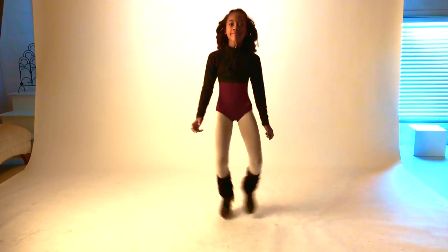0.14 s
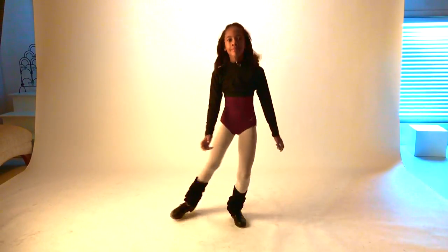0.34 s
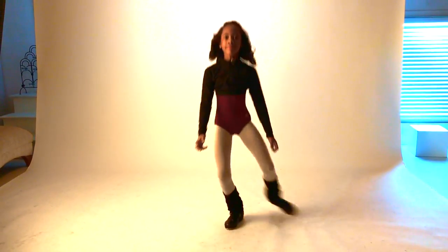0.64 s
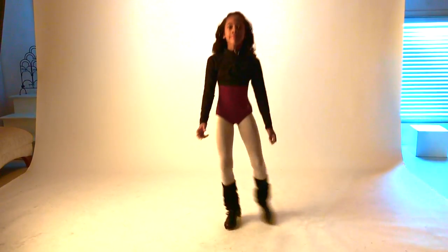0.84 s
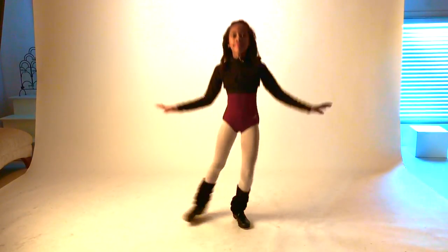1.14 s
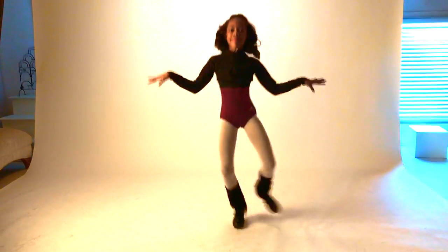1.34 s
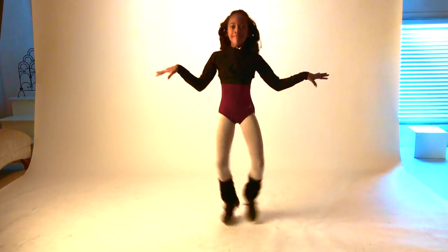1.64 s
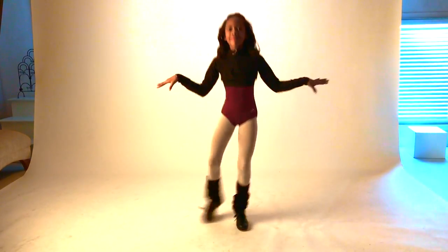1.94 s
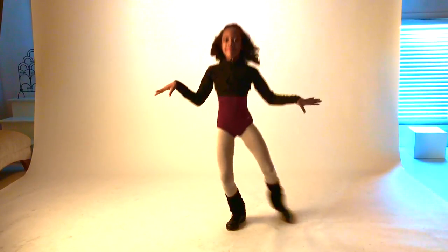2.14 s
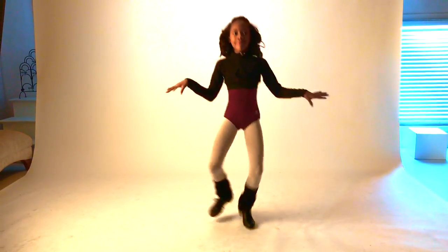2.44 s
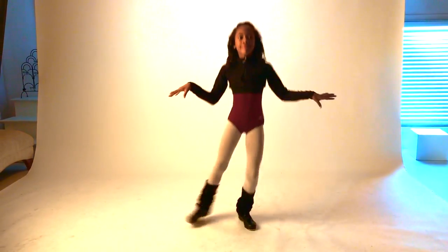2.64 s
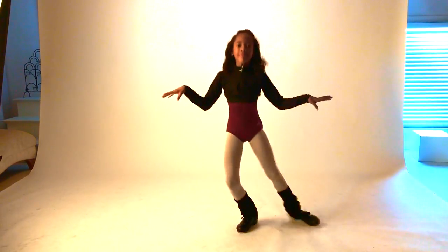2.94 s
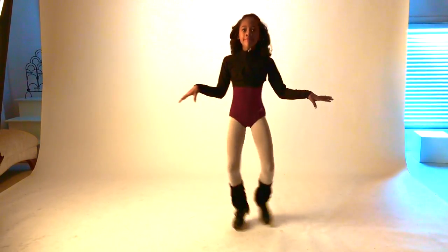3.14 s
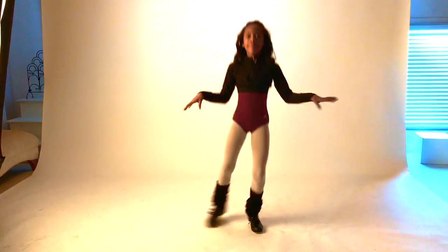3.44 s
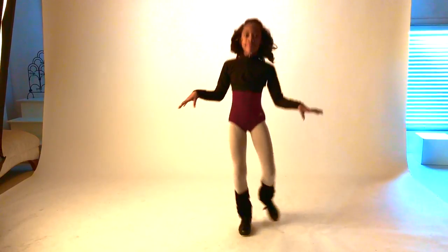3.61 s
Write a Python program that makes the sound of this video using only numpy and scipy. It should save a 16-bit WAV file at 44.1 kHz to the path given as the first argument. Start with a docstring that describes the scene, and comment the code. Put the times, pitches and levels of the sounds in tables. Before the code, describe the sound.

Tap shoes click sharply in a quick, near-continuous rhythm on a hard, echoing studio floor.

```python
"""Tap dance on a hard floor

A dancer in tap shoes steps and shuffles in a bare studio, a few metres from the microphone.
Each contact is a noise crack with a snap, damped plate and sole modes, and a floor thump of modes and noise.
The room answers with a diffuse tail, a noise cluster about 17 ms later and two delayed copies of the click.
Soft heel landings are damped sines; a quiet noise rumble lies underneath."""
import sys
import numpy as np
from scipy import signal
from scipy.fft import rfft, irfft, next_fast_len
from scipy.io import wavfile
from scipy.ndimage import map_coordinates

SR = 44100
rng = np.random.default_rng(int(sys.argv[2]) if len(sys.argv) > 2 else 0)


def store_pcm(level_fs):
    """Save levels as 16-bit WAV."""
    pcm = np.round(np.clip(level_fs, -1, 1) * 32767).astype(np.int16)
    wavfile.write(sys.argv[1], SR, np.atleast_2d(pcm).T)


N = 166257
TIME_S = np.arange(SR) / SR

# studio rumble spectrum: (frequency [Hz], relative level [dB])
AIR_COLOUR = [(20, -26), (40, -21), (57, 12), (80, -7.5), (150, 6.5), (400, 1.5), (1000, -9.5), (3000, -9),
              (7000, -32), (16000, -32)]
AIR_DB = -50.5

# floor modes: (frequency [Hz], relative level [dB], t60 [s])
FLOOR_MODES = [(58, -14, .5), (145.1, -7.5, 0.45), (181, -7.5, 0.53), (206.1, 1, 0.51), (233.4, -4, 0.41),
               (292, -7.5, 0.45)]
FLOOR_DB, FLOOR_ATTACK_S = -6.5, 0.003
# floor thud spectrum: (frequency [Hz], relative level [dB])
THUD_COLOUR = [(30, -38), (60, -29), (100, -25), (135, 2.5), (220, -5), (320, -6), (550, -15), (1200, -42),
               (4000, -70)]
THUD_DB, THUD_T60_S = 2, 0.13
# thud and its returns from the walls: (delay [s], relative level [dB])
THUMP_ECHOES = [(0, -3.5), (.014, -1.5), (.034, -1.5)]
BOOM_DB, BOOM_WIDTH_RATIO = 5.5, 0.2  # each spot of the floor booms at its own pitch

# clack as the room returns it: (frequency [Hz], relative level [dB])
CLACK_COLOUR = [(100, -31), (250, 4), (400, -1.5), (580, -5.5), (880, -0.5), (1150, -3), (1500, 1.5),
                (2100, -1), (2900, 1), (3900, 0), (5000, -1.5), (5800, -2.5), (7500, -13), (8600, -9.5),
                (10400, -23.5), (11900, -20), (16000, -34)]
# decay of the diffuse tail: (frequency [Hz], t60 [s])
ROOM_T60 = [(150, 0.8), (400, 0.89), (900, 1), (1600, 0.78), (4000, .6), (8000, 0.43), (15000, 0.27)]
TAIL_DB, TAIL_ONSET_S = -1, 0.0056
# extra colour of the first reflections: (frequency [Hz], gain [dB])
CLUSTER_COLOUR = [(200, -11.5), (800, -2), (2000, 0), (4000, 0.5), (9000, 1.5), (15000, -1)]
CLUSTER_DB, CLUSTER_DELAY_S, CLUSTER_RISE_S, CLUSTER_T60_S = 4.5, 0.01685, 0.0021, 0.079
# narrow resonances of room and floor: (frequency [Hz], gain [dB])
ROOM_PEAKS = [(716, 1.5), (835, 0.5), (940, 0.5), (1385, 2), (1549, 2), (1652, 0), (2944, 3)]
ROOM_PEAK_HALF_WIDTH_HZ = 15.6
PLATE_ECHO_DB, PLATE_ECHO_WIDTH_RATIO = 1.5, 0.093  # plate pitch stands out in the room too
GRAIN_DB, GRAIN_PER_S = 1.5, 900  # reflections arrive in uneven bunches
STEADY_POWER_SHARE = 0.21  # part of the room's answer that is the same for every tap
# clear wall reflections of the click: (delay [s], level re click [dB])
WALLS = [(0.0181, -15.5), (0.022, -13)]
WALL_SCATTER_S = 0.00034  # the feet move about
# step before the start whose echo still hangs in the room: (time [s], level [dB])
EARLIER_STEP = (-.035, -33.5)

# soft heel landings: (time [s], level [dB])
HEELS = [(3.716, -27)]
HEEL_HZ, HEEL_ATTACK_S, HEEL_T60_S = 146, 0.0064, 0.28

# metal plate modes: (ratio to plate pitch [-], relative level [dB], t60 [s])
PLATE_MODES = [(0.999, 0.5, 0.0084), (1.131, -7, 0.01), (.82, -11, 0.013), (1.42, -8, 0.0053),
               (2.27, -32, 0.0023), (3.4, -45, 0.0033)]
PLATE_DB, PLATE_ATTACK_S, MODE_SCATTER_DB = 12.5, 0.00087, 0.6
# crack spectrum: (frequency [Hz], relative level [dB])
CRACK_COLOUR = [(40, -40), (130, -12), (350, -28), (600, -1), (900, 3.5), (2300, 1.5), (4000, -1),
                (6000, 0.5), (7500, -8), (8700, -3.5), (10300, -17.5), (12000, -10), (16000, -28)]
CRACK_DB, CRACK_ATTACK_S, CRACK_T60_S = 2.5, 0.0013, 0.013
# instant when metal meets floor
SNAP_DB, SNAP_DELAY_S, SNAP_WIDTH_S, SNAP_HZ = -5.5, 0.000868, 0.00009, 8800
# hard sole modes: (frequency [Hz], relative level [dB], t60 [s])
SOLE_MODES = [(325, -9, 0.013), (874, -2.5, 0.0077), (1530, 2.5, 0.0048), (2250, 5, 0.005)]
SOLE_DB, SOLE_DELAY_S, SOLE_ATTACK_S = 0.5, 0.0011, 0.00049
# taps: (time [s], click [dB], plate pitch [Hz], plate ring [dB], clack in the room [dB],
#        hollow knock [dB], brightness [dB], floor thump [dB], thump pitch [Hz])
TAPS = [(0.0901,-14,4590,-6.5,-26,2,3,-37,152), (0.2664,-15,3610,0,-26,1.5,0.5,-30,219),
        (0.3614,-19,3780,-4,-33.5,4.5,-6.5,-38,250), (0.4825,-14,4000,-3,-24,-3.5,2.5,-33.5,228),
        (0.6339,-16,3800,0.5,-26,-1,-2.5,-29.5,162), (0.7458,-24.5,3700,-0.5,-39.5,8,-9,-37.5,200),
        (0.992,-18.5,3620,-2.5,-31,2.5,-5.5,-33.5,210), (1.1246,-34.5,3430,-1,-46.5,9,-4.5,-42,240),
        (1.2333,-15,3750,0,-22.5,-2,1,-34,230), (1.3891,-16.5,3830,-3,-28.5,2.5,-3,-30.5,210),
        (1.4955,-21,3890,-2.5,-36.5,6,-5.5,-39.5,250), (1.6114,-14.5,4160,-2,-27,2.5,1,-35,176),
        (1.7536,-17,3740,-1.5,-29,2,0,-33.5,200), (1.8517,-21.5,3460,-1,-31.5,0,-7,-33.5,405),
        (1.9871,-17,3920,-0.5,-27,-1.5,2,-39,230), (2.1471,-16.5,3760,1.5,-24.5,-2,0,-29.5,172),
        (2.2149,-23,4020,-6,-35.5,6,-5,-35.5,199), (2.346,-16.5,4520,-3,-28,1.5,1.5,-39,152),
        (2.4954,-16.5,3800,-1,-27,3,-2,-32,185), (2.5819,-18,3700,-4.5,-30,3,2,-34,207),
        (2.7307,-13.5,3810,-1.5,-24,-1.5,2.5,-33.5,249), (2.8797,-16.5,3800,0,-28,0.5,-3.5,-33.5,158),
        (2.9626,-18,4160,0,-29.5,3,-1,-36.5,199), (3.0984,-25,4210,-0.5,-35.5,5,-4,-44,250),
        (3.2595,-16,3790,-1,-29,3,-1.5,-35,170), (3.3702,-21,3650,-5.5,-33.5,2,-0.5,-42,250),
        (3.5125,-15,3600,-1.5,-25.5,-3,-4.5,-36.5,221), (3.6353,-19,3800,-7.5,-35,3,-10,-37,229),
        (3.7076,-26,3330,-14,-41.5,10,-6,-44,145)]

LOW_CUT_HZ, TOP_HZ = 48, 16300


def amp(db):
    """Amplitude factor of a level in dB."""
    return 10 ** (np.asarray(db) / 20)


def unit(x):
    """Scaled to rms 1."""
    return x / np.sqrt(np.mean(x ** 2) + 1e-20)


def along(points, hz):
    """Interpolate (Hz, value) points on a log frequency axis."""
    f, v = np.transpose(points)
    return np.interp(np.log(hz + 1), np.log(f + 1), v)


def noise(colour_db, size=SR):
    """Noise of rms 1, its spectrum shaped by a function of Hz."""
    spectrum = rfft(rng.standard_normal(size))
    return unit(irfft(spectrum * amp(colour_db(np.fft.rfftfreq(size, 1 / SR))), size))


def strike(attack_s, t60_s, delay_s=0):
    """Envelope: smooth rise, then exponential fall."""
    t = np.maximum(TIME_S - delay_s, 0)
    return (1 - np.exp(-(t / attack_s) ** 2)) * amp(-60 * t / t60_s)


def add(track, start_s, sound):
    """Mix a sound into the track at a time."""
    i = round(start_s * SR)
    part = sound[max(-i, 0):len(track) - i]
    track[max(i, 0):][:len(part)] += part


def ring(modes, attack_s, pitch=1):
    """Sum of damped modes, each blow with slightly varied levels and fully random phases."""
    out = np.zeros(SR)
    for f, db, t60_s in modes:
        level = amp(db + MODE_SCATTER_DB * rng.normal())
        phase = 2 * np.pi * (f * pitch * TIME_S + rng.random())
        out += level * strike(attack_s, t60_s) * np.sin(phase)
    return out


def shaped(x, colour_db):
    """One-second sound, its spectrum changed by a function of Hz."""
    hz = np.fft.rfftfreq(2 * SR, 1 / SR)
    return irfft(rfft(x, 2 * SR) * amp(colour_db(hz)))[:SR]


def tint(x, centre_hz, db, width_ratio):
    """Broad resonance lifting the sound by db at its centre; half-width as a share of the centre."""
    return shaped(x, lambda hz: db / (1 + ((hz / centre_hz - 1) / width_ratio) ** 2))


def touch(x, knock_db, bright_db):
    """How the foot lands sets the share of hollow knock and of treble."""
    balance = [(1700, knock_db), (3200, 0), (4400, 0), (7600, bright_db)]  # (Hz, dB)
    return shaped(x, lambda hz: along(balance, hz))


def studio_air():
    """Steady quiet rumble: coloured noise."""
    return amp(AIR_DB) * noise(lambda hz: along(AIR_COLOUR, hz), size=N)


def reverberation():
    """Diffuse tail of a clack: noise decaying per frequency band, treble dying first."""
    source = noise(lambda hz: along(CLACK_COLOUR, hz))
    hz, t, bins = signal.stft(source, SR, nperseg=256)
    decay = amp(-60 * t / along(ROOM_T60, hz)[:, None])
    tail = signal.istft(bins * decay, SR, nperseg=256)[1][:SR]
    return amp(TAIL_DB) * tail * (1 - np.exp(-TIME_S / TAIL_ONSET_S))


def cluster():
    """Bright burst of first reflections: delayed, decaying noise."""
    scatter = noise(lambda hz: along(CLACK_COLOUR, hz) + along(CLUSTER_COLOUR, hz))
    return amp(CLUSTER_DB) * scatter * strike(CLUSTER_RISE_S, CLUSTER_T60_S, CLUSTER_DELAY_S)


def room_resonances(hz):
    """Fine colour of the room in dB: narrow peaks."""
    return sum(db / (1 + ((hz - f) / ROOM_PEAK_HALF_WIDTH_HZ) ** 2) for f, db in ROOM_PEAKS)


def echo(steady, plate_hz):
    """Room's answer to one tap: partly the same each time, grainy, tinted by the plate."""
    fresh = cluster() + reverberation()
    mixed = np.sqrt(STEADY_POWER_SHARE) * steady + np.sqrt(1 - STEADY_POWER_SHARE) * fresh
    answer = shaped(mixed, room_resonances)
    grain = map_coordinates(rng.standard_normal(SR // 8), [TIME_S * GRAIN_PER_S], order=1)
    bunches = unit(amp(GRAIN_DB * grain))
    return tint(answer * bunches, plate_hz, PLATE_ECHO_DB, PLATE_ECHO_WIDTH_RATIO)


def thump(boom_hz):
    """Dancer's weight booms in the floor: ringing modes plus a thud that returns from the walls."""
    power = sum((amp(db) * strike(FLOOR_ATTACK_S, THUD_T60_S, delay_s)) ** 2
                for delay_s, db in THUMP_ECHOES)
    swell = np.sqrt(power)
    rumble = noise(lambda hz: along(THUD_COLOUR, hz))
    thud = swell * tint(rumble, boom_hz, BOOM_DB, BOOM_WIDTH_RATIO)
    thud *= np.linalg.norm(swell) / np.linalg.norm(thud)  # energy set by the envelope
    return amp(FLOOR_DB) * ring(FLOOR_MODES, FLOOR_ATTACK_S) + amp(THUD_DB) * thud


def earlier_step():
    """Room answer and thump of a step made before the start."""
    room = touch(cluster() + reverberation(), knock_db=4, bright_db=-5.5)
    return room + amp(-6) * thump(boom_hz=200)


def heel():
    """Soft heel landing: a low damped sine."""
    return strike(HEEL_ATTACK_S, HEEL_T60_S) * np.sin(2 * np.pi * HEEL_HZ * TIME_S)


def crack():
    """Noise burst of the impact, its energy set by the envelope."""
    envelope = strike(CRACK_ATTACK_S, CRACK_T60_S)
    burst = noise(lambda hz: along(CRACK_COLOUR, hz)) * envelope
    return amp(CRACK_DB) * burst * np.linalg.norm(envelope) / np.linalg.norm(burst)


def snap():
    """Metal meets floor: a very short two-sided sine pulse."""
    t = TIME_S - SNAP_DELAY_S
    return amp(SNAP_DB) * np.exp(-np.abs(t) / SNAP_WIDTH_S) * np.sin(2 * np.pi * SNAP_HZ * t)


def click(plate_hz, ring_db):
    """Shoe hits floor: crack and snap, a few cycles of the plate, then the knock of the sole."""
    plate = amp(PLATE_DB + ring_db) * ring(PLATE_MODES, PLATE_ATTACK_S, plate_hz)
    out = plate + crack() + snap()
    add(out, SOLE_DELAY_S, amp(SOLE_DB) * ring(SOLE_MODES, SOLE_ATTACK_S))
    return out


def dance():
    """Every tap with its echoes and thump, the heel landings and the earlier step."""
    out = np.zeros(N)
    steady = cluster() + reverberation()
    for s, click_db, plate_hz, ring_db, clack_db, knock_db, bright_db, thump_db, boom_hz in TAPS:
        direct = amp(click_db) * touch(click(plate_hz, ring_db), 0, bright_db)
        room = amp(clack_db) * touch(echo(steady, plate_hz), knock_db, bright_db)
        add(out, s, direct + room + amp(thump_db) * thump(boom_hz))
        for delay_s, db in WALLS:
            add(out, s + delay_s + WALL_SCATTER_S * rng.normal(), amp(db) * direct)
    for s, db in HEELS:
        add(out, s, amp(db) * heel())
    s, db = EARLIER_STEP
    add(out, s, amp(db) * earlier_step())
    return out


def scene():
    """The dance over the quiet rumble of the studio, one channel."""
    return (studio_air() + dance())[None]


def record(dry):
    """Thin the deepest bass with a high-pass; keep nothing from the top limit up."""
    size = next_fast_len(N + SR // 2)
    hz = np.fft.rfftfreq(size, 1 / SR)
    low_cut = signal.butter(2, LOW_CUT_HZ, "high", fs=SR, output="sos")
    thinned = signal.sosfilt(low_cut, dry)
    return irfft(rfft(thinned, size) * (hz < TOP_HZ), size)[:, :N]


dry = scene()
out = record(dry)
store_pcm(out)
```